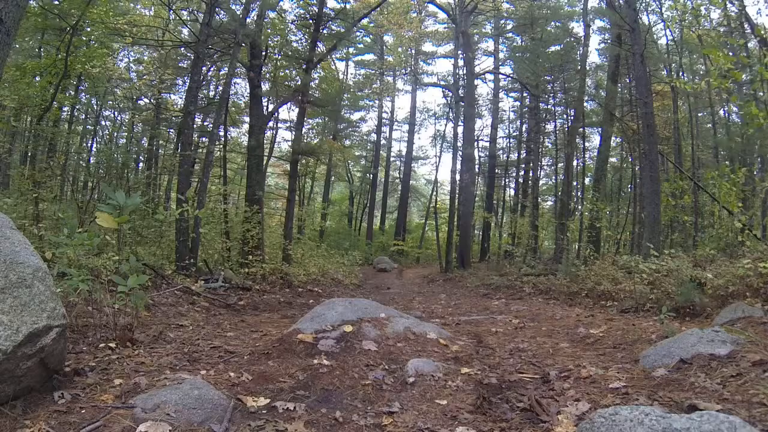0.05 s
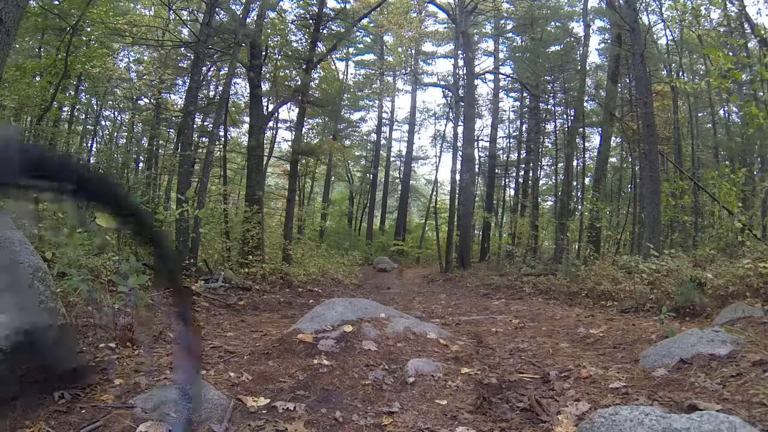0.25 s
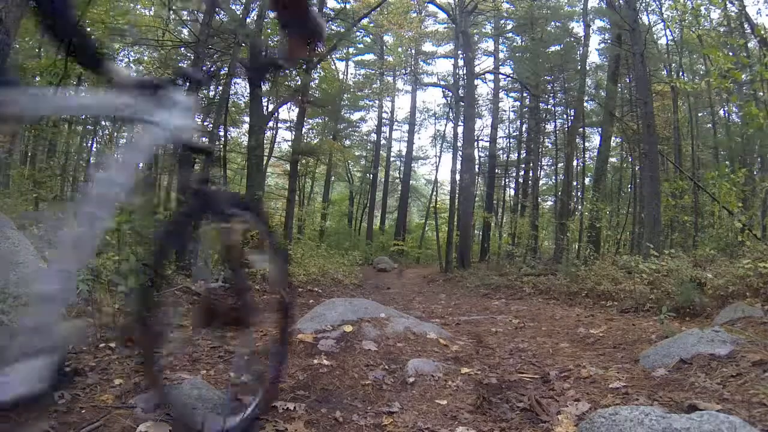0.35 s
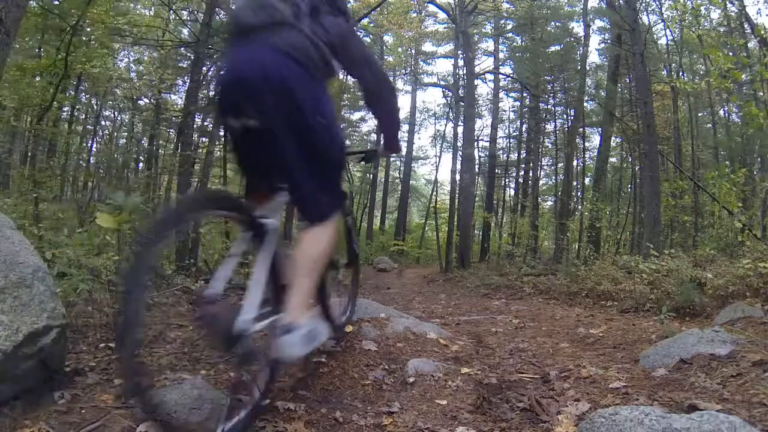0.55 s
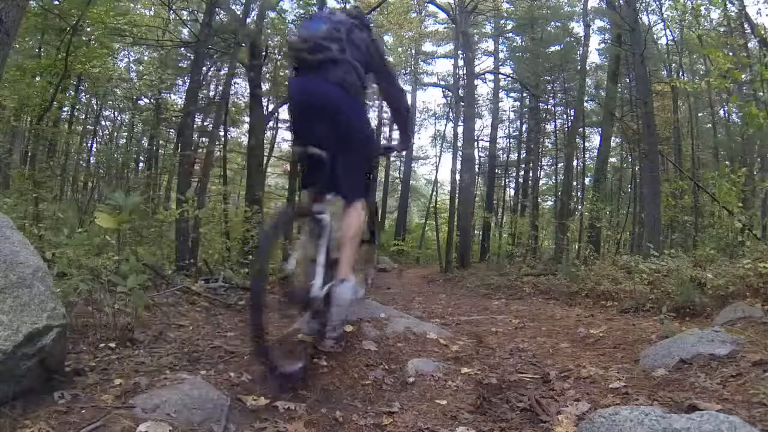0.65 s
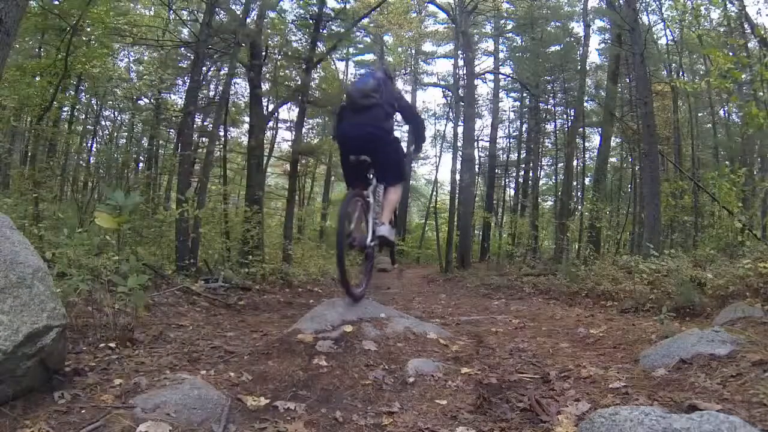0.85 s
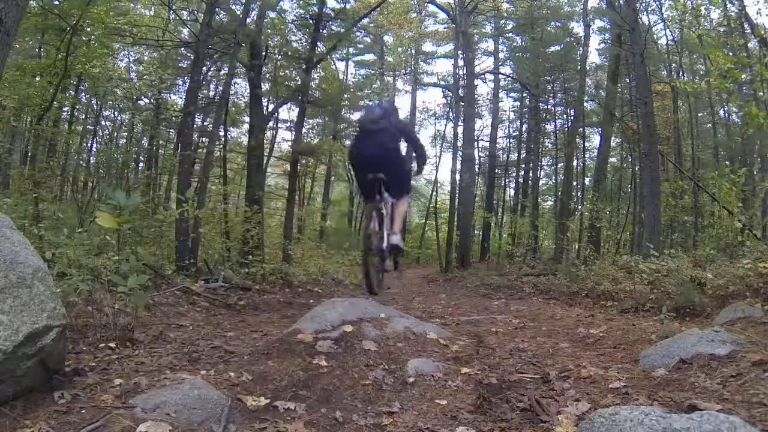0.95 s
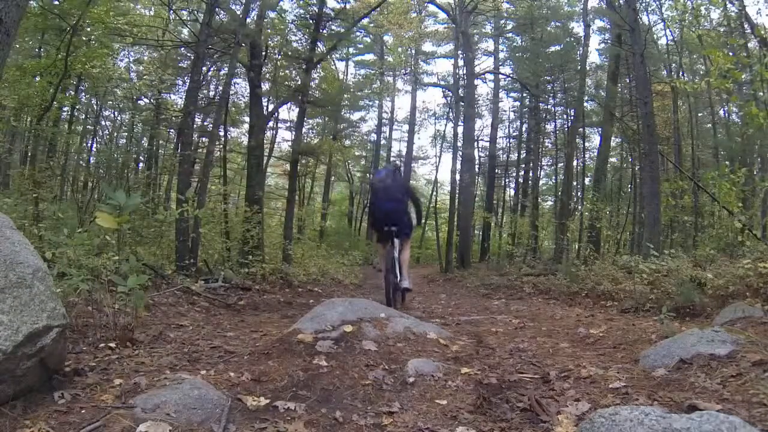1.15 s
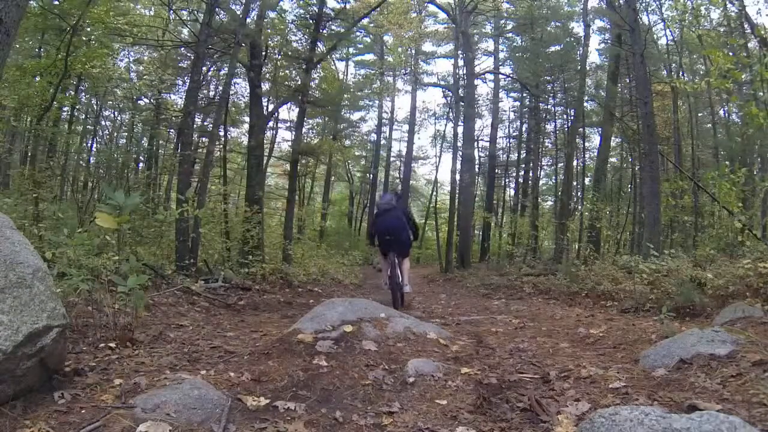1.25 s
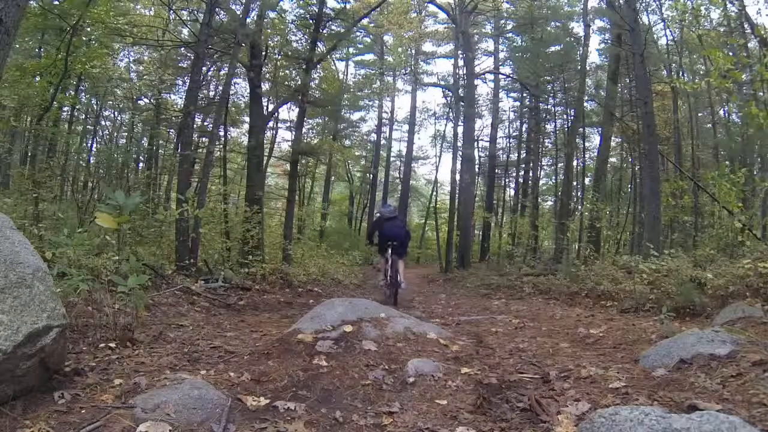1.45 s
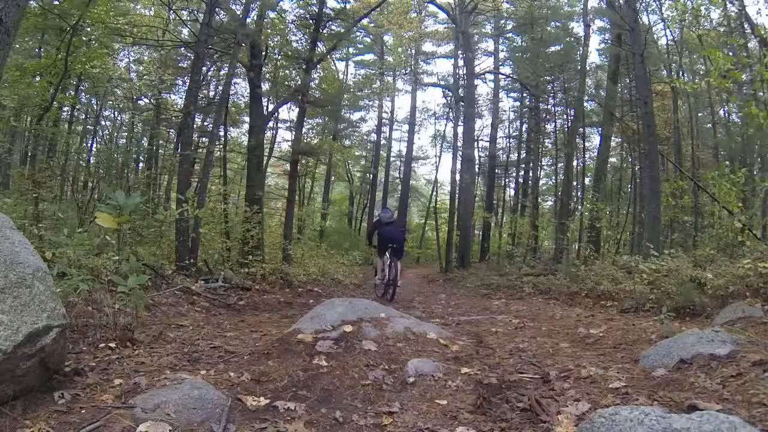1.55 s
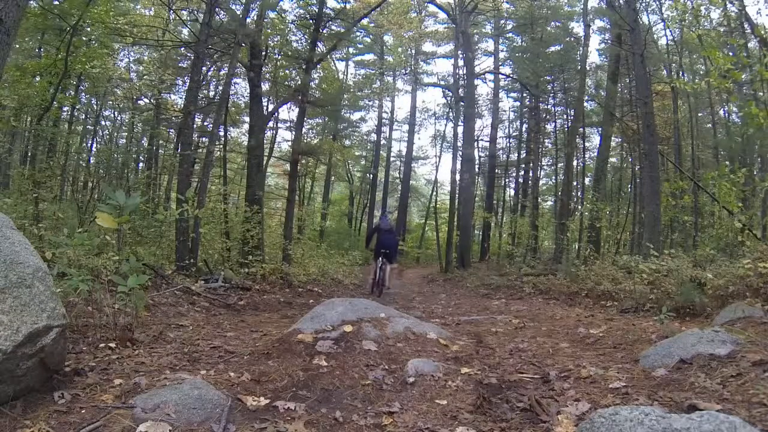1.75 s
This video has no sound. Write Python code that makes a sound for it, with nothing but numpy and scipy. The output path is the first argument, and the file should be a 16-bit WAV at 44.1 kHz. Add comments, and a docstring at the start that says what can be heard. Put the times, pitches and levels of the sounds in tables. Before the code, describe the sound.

A mountain bike passes close by on a quiet forest trail. From about 0.2 to 0.7 seconds its tyres crunch and pop over grit, twigs and leaves, with faint freewheel ticks and low rumble. They knock dully on a rock near 0.6 seconds. After a lull, the bike lands at 1.2 seconds with a sharp, briefly ringing metal clack and low thuds, fading away by 1.8 seconds.

```python
"""Tyres crunch over grit and dry leaves in a quiet forest hush: a mountain bike is rolling past.
Stones and twigs pop, coloured by the hollow housing of a camera low on the trail; the freewheel ticks.
The ground rumbles and thuds under the wheels and sets the camera mount swaying.
The tyres knock on a rock, the bike hops it and lands with a ringing metal clack, then rides off.
Tree trunks scatter a short echo of the tyres and the metal."""
import sys
import numpy as np
from scipy import signal
from scipy.io import wavfile

SR = 44100
rng = np.random.default_rng(int(sys.argv[2]) if len(sys.argv) > 2 else 0)


def dump(signal):
    """Clip the signal to [-1, 1] and save it as 16-bit WAV at the path in sys.argv[1]."""
    limited = np.clip(np.atleast_2d(signal).T, -1, 1)
    pcm = np.round(limited * 32767).astype(np.int16)
    wavfile.write(sys.argv[1], SR, pcm)


N = 79380
T = np.arange(N) / SR
HZ = np.fft.rfftfreq(4096, 1 / SR)

# Forest air and microphone hiss. Each row: frequency in Hz, level in dB.
HUSH_EQ = [(30, -2), (120, -1), (200, -4), (400, -9), (900, -13.5), (1450, -17), (2100, -19), (3100, -16.5),
           (4200, -22.5), (6500, -26), (8800, -30.5), (9700, -28), (10060, -19.5), (10450, -29),
           (11500, -31.5), (14500, -37.5)]
# Fader for the grit under the tyres. Each row: time in seconds, level in dB.
GRIT_FADER = [(.07, -65), (.19, -60), (.24, -60), (.29, -56), (.32, -64), (.36, -59), (.44, -62.5),
              (.49, -59), (.55, -62.5), (.60, -58.5), (.67, -67), (.8, -70), (1.0, -78), (1.17, -72.5),
              (1.23, -71), (1.38, -74.5), (1.55, -74.5), (1.8, -83)]
# Colour of crushed grit and stones. Each row: frequency in Hz, level in dB.
GRIT_EQ = [(100, -10.5), (300, -5), (900, -11), (1400, -1), (2000, -4.5), (3100, 2), (4100, -10),
           (6500, -17), (10000, -25), (15000, -32)]
# Dry leaves brushed aside. Each row: centre in seconds, width in seconds, level in dB.
LEAF_SWELLS = [(.145, 0.029, -69), (.29, 0.016, -74), (.35, 0.0088, -65.5), (.412, 0.0037, -71),
               (.465, 0.017, -76), (.555, 0.028, -70), (.70, 0.039, -69.5)]
# Their crisp colour. Each row: frequency in Hz, level in dB.
LEAF_EQ = [(500, -23), (2500, 5.5), (5000, 1), (7500, -1.5), (9000, -6.5), (11000, -4), (15000, -9)]
# Tyres scuffing dirt. Each row: centre in seconds, width in seconds, level in dB.
SCUFF_SWELLS = [(.365, 0.012, -62.5), (.48, 0.0083, -62), (.572, 0.008, -62), (.603, 0.0065, -59.5),
                (.635, 0.018, -62.5)]
# Their dull colour. Each row: frequency in Hz, level in dB.
SCUFF_EQ = [(80, -11.5), (260, 1.5), (380, -3), (510, 1.5), (900, -4.5), (2000, -12), (5000, -32),
            (15000, -55)]
# Fader for the rolling rumble. Each row: time in seconds, level in dB.
RUMBLE_FADER = [(.07, -65), (.22, -58.5), (.33, -58.5), (.42, -63.5), (.6, -54), (.9, -60), (1.17, -69),
                (1.25, -52.5), (1.4, -52), (1.6, -64.5), (1.8, -63.5)]
# Low end of the soil. Each row: frequency in Hz, level in dB.
RUMBLE_EQ = [(15, -5), (30, -2), (48, 2), (70, 0), (90, -16.5), (120, -11), (200, -25), (600, -52.5)]
# Fader for the swaying mount. Each row: time in seconds, level in dB.
SWAY_FADER = [(.07, -70), (.44, -60.5), (.56, -46), (.66, -40.5), (.85, -39), (1.1, -40.5), (1.3, -46),
              (1.5, -56), (1.8, -65)]
# Wheels thudding on the ground. Each row: start in seconds, gain in dB, decay in seconds.
THUD_HITS = [(.47, -47, 0.053), (.575, -51, 0.18), (1.209, -39, 0.077), (1.315, -43.5, 0.12),
             (1.521, -53.5, .13)]
# Stones and twigs popping. Each row: start in seconds, peak in dB, brightness in dB per octave.
POP_HITS = [(0.1792, -60, 3), (0.1954, -50, 3), (0.204, -50, 3), (0.2093, -35.5, 3), (0.2663, -53.5, -3.5),
            (0.2899, -49.5, 0), (0.2945, -44.5, 3.5), (0.3206, -44.5, -0.5), (0.341, -59, 1),
            (0.3822, -39.5, -2), (0.386, -45, -2.5), (0.4004, -49, -2.5), (.4068, -54, -1),
            (0.4157, -47, -1), (0.4773, -45, -3.5), (0.4817, -44.5, -0.5), (0.5219, -52, -2),
            (0.5603, -42.5, -6), (0.5727, -44.5, -7), (0.5943, -42, -2), (0.5991, -41.5, -3.5),
            (.6030, -43, -3), (0.6166, -43.5, -5), (0.6561, -49, 0.5), (1.23, -51, 0), (1.241, -56, 4),
            (1.331, -53.5, 1.5)]
# Freewheel pawl ticks. Each row: start in seconds, level in dB.
PAWL_HITS = [(.2682, -71), (.2940, -73), (.3246, -67), (.3474, -69), (.3748, -67), (.401, -62),
             (.4288, -69), (.4543, -62), (.4815, -67), (.5102, -66)]
# The pawl's thin ring. Each row: frequency in Hz, level in dB.
PAWL_EQ = [(2000, -22), (6000, -16), (10000, -13), (12000, -8), (13000, -11), (14000, 0), (14600, -4),
           (15500, -16)]
# Tyres knocking on rock. Each row: start in seconds, gain in dB.
KNOCK_HITS = [(.5605, -48.5), (.5665, -54.5), (0.5943, -53.5), (0.6016, -54.5)]
# Modes of the struck tyre. Each row: frequency in Hz, relative level in dB, 60 dB decay in seconds.
TYRE_MODES = [(271, -4.5, 0.072), (385, -9, 0.037), (490, 0, 0.039), (720, -4.5, 0.028), (880, -3, 0.012)]
# Metal cracks on landing. Each row: start in seconds, level in dB before the trim.
CRACK_HITS = [(1.19, -57), (1.1922, -46.5), (1.1933, -47.5)]
# Their bright colour. Each row: frequency in Hz, level in dB.
CRACK_EQ = [(1000, -36), (2500, -10), (3200, 0), (6000, -0.5), (8000, -3.5), (9500, -19), (13000, -14),
            (15500, -24)]
# Ringing metal. Each row: frequency in Hz, relative level in dB, 60 dB decay and attack in seconds.
METAL_MODES = [(1537, 7, .05, .011), (2925, -6.5, .025, .001), (3317, -4, .04, .001),
               (3641, -14, .04, .001), (3961, -.5, .03, .001), (4248, -8, .035, .001),
               (4512, -10.5, .035, .001), (5284, -9, .028, .001), (5430, -7, .032, .001),
               (6035, -3, .025, .001), (6722, -17, .25, .007), (6778, -21, .3, .007),
               (6812, -26, .55, .007), (7120, -11, .04, .001), (8230, -3, .027, .004),
               (13150, -20, .025, .001)]

HOUSING_HZ, HOUSING_WIDTH_HZ, HOUSING_DB = 1417, 254, 16.5  # the housing's hollow resonance


def amp(db):
    """Decibels to gain."""
    return 10 ** (np.asarray(db) / 20)


def unit(x):
    """Scales to rms 1."""
    return x / np.sqrt(np.mean(x ** 2) + 1e-20)


def eq_curve(points):
    """A spectrum in dB, joined on a log-frequency axis."""
    hz, db = np.transpose(points)
    return np.interp(np.log(HZ + 1), np.log(hz), db)


def fader(points):
    """A fader ride as gain per sample."""
    return amp(np.interp(T, *np.transpose(points)))


def swells(rows):
    """Gain of short rounded swells of friction."""
    return sum(amp(db) * np.exp(-.5 * ((T - centre) / width) ** 2) for centre, width, db in rows)


def add(mix, start, sound):
    """Mixes a sound in at a start time in seconds."""
    part = mix[max(round(start * SR), 0):][:len(sound)]
    part += sound[:len(part)]


def impulse(db):
    """A minimum-phase click with the given spectrum."""
    log_gain = np.log(amp(np.r_[db, db[-2:0:-1]]))
    return np.fft.ifft(np.exp(signal.hilbert(log_gain).conj())).real


def noise(points):
    """Noise of rms 1 with the given EQ."""
    taps = impulse(eq_curve(points))
    white = rng.standard_normal(N + len(taps) - 1)
    return unit(signal.fftconvolve(white, taps, "valid"))


def grains(colour, per_s, spread_db):
    """A dense patter of uneven clicks with the given spectrum, rms 1."""
    size = amp(spread_db * np.minimum(rng.exponential(1, N), 3))
    clicks = size * rng.choice([-1, 1], N) * (rng.random(N) < per_s / SR)
    return unit(signal.fftconvolve(clicks, impulse(colour))[:N])


def hush(whine_hz=10393):
    """A bed of still forest air, with the microphone's hiss and faint whine."""
    whine = np.sqrt(2) * np.sin(2 * np.pi * whine_hz * T)
    return amp(-63) * noise(HUSH_EQ) + amp(-93.5) * whine


def grit_colour():
    """Spectrum of grit heard through the hollow housing."""
    return eq_curve(GRIT_EQ) + HOUSING_DB / (1 + ((HZ - HOUSING_HZ) / HOUSING_WIDTH_HZ) ** 2)


def crunch():
    """Countless grains of grit slip under the tread; dry leaves crackle and dirt scuffs."""
    grit = fader(GRIT_FADER) * grains(grit_colour(), per_s=1500, spread_db=4)
    leaves = swells(LEAF_SWELLS) * grains(eq_curve(LEAF_EQ), per_s=2300, spread_db=3)
    scuffs = swells(SCUFF_SWELLS) * noise(SCUFF_EQ)
    return grit + leaves + scuffs


def ground(sway_hz=17.1, thud_hz=61.18, attack_s=.0146):
    """The low end: soil rumbles and thuds under the wheels, and the camera mount sways."""
    rumble = fader(RUMBLE_FADER) * noise(RUMBLE_EQ)
    sway = fader(SWAY_FADER) * np.sqrt(2) * np.sin(2 * np.pi * sway_hz * T)
    out = rumble + sway
    for start, db, decay in THUD_HITS:
        envelope = (1 - np.exp(-T / attack_s)) * np.exp(-T / decay)
        add(out, start, amp(db) * envelope * np.sin(2 * np.pi * thud_hz * T))
    return out


def tree_echoes(send, per_s=2000, t60=.436, predelay_s=.006):
    """Tree trunks scatter the sound into a short reverb tail."""
    reflections = rng.standard_normal(N) * (rng.random(N) < per_s / SR)
    tail = reflections * amp(-60 * T / t60) * (T > predelay_s)
    return signal.fftconvolve(send, tail / np.linalg.norm(tail))[:N]


def pops(crumble_s=.0015):
    """Larger stones and twigs snap with a brief crumble and knock the housing into a short ring."""
    out, t = np.zeros(N), T[:len(HZ)]
    octaves = np.log2(np.maximum(HZ / HOUSING_HZ, .3))
    ring_age = np.pi * HOUSING_WIDTH_HZ * t
    ring_envelope = amp(1.5) * ring_age * np.exp(-ring_age)
    for start, db, brightness in POP_HITS:
        crumble = .3 * rng.standard_normal(len(t)) * np.exp(-t / crumble_s)
        crumble[0] = 1  # the opening transient
        snap = signal.fftconvolve(crumble, impulse(grit_colour() + brightness * octaves))[:len(t)]
        ring_hz = HOUSING_HZ * (1 + .022 * rng.standard_normal())
        pop = snap / abs(snap).max() + ring_envelope * np.cos(2 * np.pi * ring_hz * t)
        add(out, start, amp(db) * pop / abs(pop).max())
    return out


def freewheel(attack_s=.0013):
    """The pawl ticks thinly while the hub is close."""
    envelope = np.zeros(N)
    for start, db in PAWL_HITS:
        add(envelope, start, amp(db) * T / attack_s * np.exp(1 - T / attack_s))
    return envelope * noise(PAWL_EQ)


def knocks(attack_s=.0012, detune=.04):
    """The tyre bumps over rock and answers with a short, hollow knock."""
    out, t = np.zeros(N), T[:N // 8]
    for start, db in KNOCK_HITS:
        pitch = 1 + detune * rng.uniform(-1, 1)  # each hit loads the tyre a little differently
        ring = sum(amp(mode_db - 60 * t / t60) * np.sin(2 * np.pi * (hz * pitch * t + rng.random()))
                   for hz, mode_db, t60 in TYRE_MODES)
        add(out, start, amp(db) * (1 - np.exp(-t / attack_s)) * ring)
    return out


def clack(trim_db=-2.5, crack_decay_s=.0022, ring_start_s=1.1912, ring_db=-48.5):
    """Metal hits metal: a chatter of cracks and short partials, then the frame and a high, beating ring."""
    out, t = np.zeros(N), T[:N // 2]
    for start, db in CRACK_HITS:
        add(out, start, amp(db + trim_db) * noise(CRACK_EQ) * np.exp(-T / crack_decay_s))
    for hz, db, t60, attack in METAL_MODES:
        envelope = amp(ring_db + db - 60 * t / t60) * (1 - np.exp(-(t / attack) ** 2))
        add(out, ring_start_s, envelope * np.sin(2 * np.pi * hz * t))
    return out


def scene():
    """The passing bike in mono, with tyres and metal sent to the tree echoes."""
    tyres = crunch() + pops() + knocks()
    metal = clack()
    echoes = tree_echoes(amp(-15) * tyres + amp(-5.5) * metal)
    return (tyres + metal + echoes + freewheel() + ground() + hush())[None]


def record(dry, start_s=.072, cutoff_hz=15000):
    """The sound opens after a moment of silence; a steep low-pass trims the top."""
    lowpass = signal.firwin(511, cutoff_hz, window=("kaiser", 9), fs=SR)
    return signal.oaconvolve(dry * (T > start_s), lowpass[None], "same")


dry = scene()
out = record(dry)
dump(out)
```